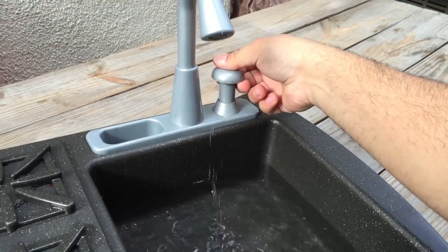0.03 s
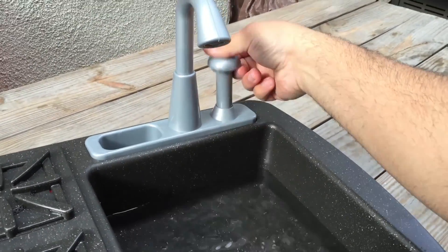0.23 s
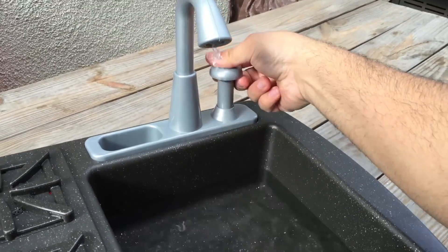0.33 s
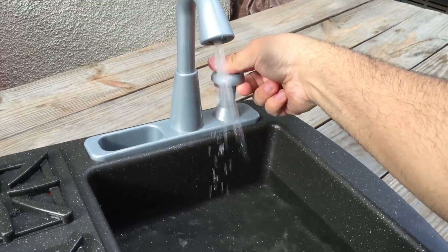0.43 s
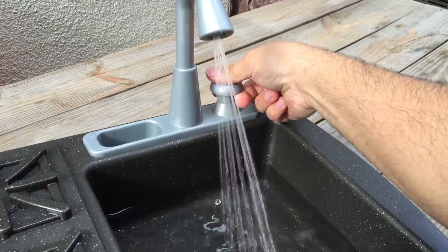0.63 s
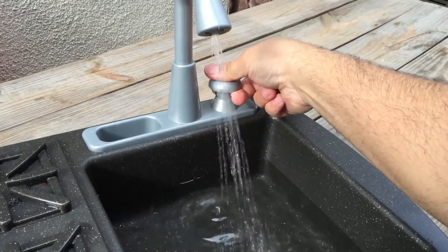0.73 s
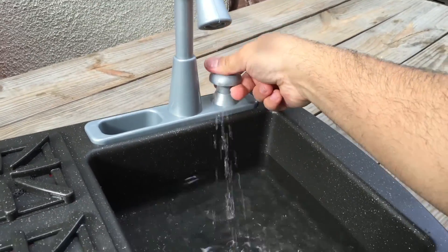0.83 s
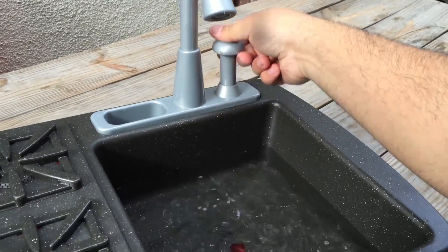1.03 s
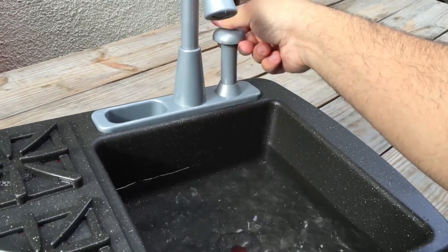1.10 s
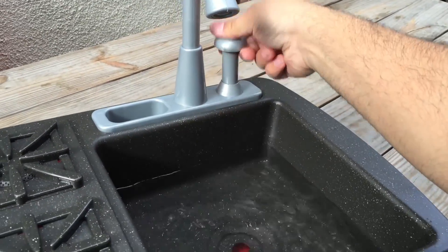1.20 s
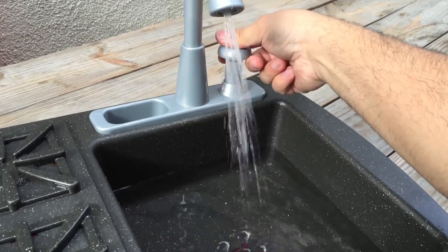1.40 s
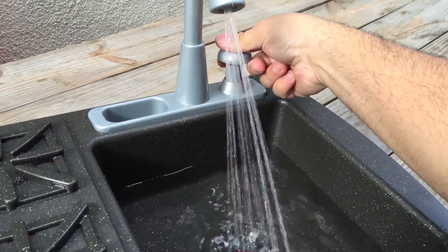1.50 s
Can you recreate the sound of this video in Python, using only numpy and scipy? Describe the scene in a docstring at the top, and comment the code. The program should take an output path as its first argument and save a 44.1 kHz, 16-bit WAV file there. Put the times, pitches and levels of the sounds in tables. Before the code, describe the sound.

Water sprays briefly from a toy faucet after its plastic plunger clacks, hissing and drumming in the basin. Drips settle, the pump knocks again and the nozzle sputters, close by over faint outdoor air and a low hum.

```python
"""A toy tap is pumped by hand over a plastic sink, outdoors beside a wall.
The plunger rubs in its barrel, knocking at the top of its travel and again as it is pressed.
The nozzle spits air, then sprays into the shallow water, drumming on the basin and leaving
bubbles and drips. A low hum and soft outdoor air lie behind."""
import sys
import numpy as np
from scipy import signal
from scipy.fft import rfft, irfft, next_fast_len
from scipy.io import wavfile
from scipy.ndimage import map_coordinates

SR = 44100
rng = np.random.default_rng(int(sys.argv[2]) if len(sys.argv) > 2 else 0)


def to_wav(s):
    """Save 16-bit WAV."""
    ch = np.atleast_2d(s).T  # columns
    pcm = np.round(np.clip(ch, -1, 1) * 32767)  # PCM
    wavfile.write(sys.argv[1], SR, pcm.astype(np.int16))


N = 68355

# Tone of drops hitting shallow water. Each row: frequency in Hz, level in dB.
SPLASH_TONE = [(300, -7.5), (850, -4.5), (1400, 0), (1750, -2), (2100, 8), (2450, -3), (3000, 1.5),
               (4200, -1.5), (6000, -16), (9000, -11.5), (16000, -18)]


def amp(db):
    """Decibels to gain."""
    return 10 ** (np.asarray(db) / 20)


def unit(x):
    """x scaled to rms 1."""
    return x / np.sqrt(np.mean(x ** 2) + 1e-20)


def since(start):
    """Seconds since start, zero before it."""
    return np.maximum(np.arange(N) / SR - start, 0)


def along(points, hz):
    """A curve through (Hz, value) points on a log frequency axis."""
    freqs, values = np.transpose(points)
    return np.interp(np.log(hz + 1), np.log(freqs + 1), values)


def level(points):
    """A gain envelope through (seconds, dB) points."""
    times, db = np.transpose(points)
    return amp(np.interp(since(0), times, db))


def filtered(x, response):
    """x through a filter given as a complex response of frequency."""
    size = 2 * next_fast_len(N)
    return irfft(rfft(x, size) * response(np.fft.rfftfreq(size, 1 / SR)), size)[..., :N]


def colour(x, tone):
    """x through a minimum-phase EQ of (Hz, dB) points, at rms 1."""
    size = 2 * next_fast_len(N)
    cepstrum = irfft(np.log(amp(along(tone, np.fft.rfftfreq(size, 1 / SR)))), size)
    cepstrum[1:size // 2] *= 2
    cepstrum[size // 2 + 1:] = 0
    return unit(irfft(rfft(x, size) * np.exp(rfft(cepstrum)), size)[:N])


def noise(tone):
    """Coloured noise at rms 1."""
    return colour(rng.standard_normal(N), tone)


def strike(start, rise, t60):
    """A hit's envelope: quick attack, then a fall of 60 dB in t60 seconds."""
    t = since(start)
    return -np.expm1(-t / rise) * amp(-60 * t / t60)


def ring(start, modes, rise):
    """Damped modes (Hz, dB, t60 in seconds) set off together."""
    t = since(start)
    return sum(amp(db) * strike(start, rise, t60) * np.sin(2 * np.pi * hz * t) for hz, db, t60 in modes)


def patter(tone, per_second, spread_db=4.5):
    """Tiny random blows of uneven size, coloured by tone, at rms 1."""
    blows = (rng.random(N) < per_second / SR) * rng.choice([-1, 1], N)
    sizes = amp(spread_db * np.clip(rng.standard_normal(N), -2, 2))
    return colour(blows * sizes, tone)


def plunger():
    """Each knock cracks, clicks the valve and rings the plastic; the plunger rubs as it slides."""
    # Plunger knocks. Each row: start in seconds, stem level in dB, stem ring centre in Hz,
    # levels of basin, thud, crack and valve click in dB, click pitch in Hz.
    knocks = [(0.0749, -31.5, 1380, -20, -37, -37.5, -35, 2760),
              (0.1816, -40, 1380, -31, -34.5, -35, -50, 6040),
              (0.2297, -16, 1510, -7.5, -44, -15.5, -26.5, 5980),
              (.353, -11.5, 1490, -13, -13.5, -21.5, -21, 5550),
              (0.3645, -22, 1690, -15, -24.5, -16.5, -14.5, 4300),
              (1.1368, -32, 1130, -27.5, -26, -31, -32, 4380),
              (1.1984, -22, 1460, -14.5, -29.5, -27.5, -29, 6030),
              (1.2998, -13.5, 1150, -15, -15, -22.5, -30, 5040),
              (1.3139, -27, 1830, -20.5, -27, -16.5, -19.5, 3660)]
    # Modes of the pump stem, the basin wall and the whole sink.
    # Each row: frequency in Hz, relative level in dB, t60 in seconds.
    stem_modes = [(1158, 1.5, 0.024), (1338, 10, 0.016), (1524, 8, 0.013), (1742, 1, .028),
                  (2040, -23, 0.02), (2790, 10, 0.021)]
    basin_modes = [(518, -15, 0.015), (590, 5, 0.014), (740, -5.5, 0.013), (878, -8.5, 0.028)]
    thud_modes = [(149, -24.5, 0.26), (216, -14, 0.066), (273, -3, 0.044), (342, -0.5, 0.049)]
    # Tones of the crack and the rub. Each row: frequency in Hz, level in dB.
    crack_tone = [(300, -11), (1500, 3), (2400, 0), (3200, -1), (4500, -8), (6400, -7), (7600, -20),
                  (8500, -16), (10000, -26.5), (11800, -17), (16000, -26)]
    rub_tone = [(100, -16), (220, 4), (550, -2), (780, 5), (1100, 3.5), (1700, -1.5), (2400, -19.5),
                (6000, -19), (16000, -41)]
    # Slides along the barrel. Each row: start and end in seconds, level in dB.
    slides = [(-.05, 0.435, -51), (1.105, 1.41, -49.5)]
    focus_db = 22  # loss one octave from the stem ring's centre
    bend_lag_s, bend_hz, slide_fade_s = 0.00482, 889, 0.014
    body, clicks = np.zeros(N), np.zeros(N)
    for start, stem_db, centre_hz, basin_db, thud_db, crack_db, valve_db, valve_hz in knocks:
        stem = [(hz, db - focus_db * np.log2(hz / centre_hz) ** 2, t60) for hz, db, t60 in stem_modes]
        body += amp(stem_db) * ring(start, stem, rise=0.00071)
        body += amp(basin_db) * ring(start, basin_modes, rise=0.0014)
        body += amp(thud_db) * ring(start, thud_modes, rise=0.0031)
        clicks += amp(crack_db) * strike(start, rise=0.00025, t60=0.02) * noise(crack_tone)
        clicks += amp(valve_db) * valve_tick(start, valve_hz, t60=0.013)
    # The low notes travel more slowly through the plastic and arrive last.
    body = filtered(body, lambda hz: np.exp(-2j * np.pi * bend_lag_s * bend_hz * np.arctan(hz / bend_hz)))
    stroke = sum(amp(db) * -np.expm1(-since(start) / slide_fade_s) * np.exp(-since(end) / slide_fade_s)
                 for start, end, db in slides)
    return body + clicks + stroke * patter(rub_tone, per_second=1100, spread_db=6.5)


def valve_tick(start, hz, t60):
    """A short wet click: a burst of noise in one broad resonance."""
    width_hz = 0.15 * hz
    band = filtered(rng.standard_normal(N), lambda f: 1 / (1 + (2 * (f - hz) / width_hz) ** 2))
    return strike(start, rise=0.00027, t60=t60) * unit(band)


def nozzle():
    """Trapped air leaks and spits out in whistling puffs, the jet crackles and the valve ticks."""
    # Spits of air and water. Each row: peak time in seconds, hiss level in dB,
    # half length in seconds, whistle level in dB.
    spits = [(.535, -36, 0.0017, -47), (0.5432, -27.5, 0.0013, -24.5), (0.55, -38, 0.0018, -62),
             (0.568, -40, 0.0007, -53), (0.601, -28, 0.002, -36), (.727, -21.5, 0.0014, -55),
             (0.884, -39.5, 0.0017, -50), (1.483, -33.5, 0.0017, -32), (1.488, -37, 0.0018, -37.5),
             (1.495, -32.5, 0.001, -31), (1.501, -46, 0.0032, -44), (1.513, -32.5, 0.0015, -40),
             (1.5345, -31, 0.00076, -55), (1.5401, -37.5, 0.00076, -35.5), (1.5442, -34, 0.00067, -42),
             (1.5495, -30.5, 0.00099, -33)]
    # Tones of the spit, the whistle and the jet. Each row: frequency in Hz, level in dB.
    spit_tone = [(500, -8.5), (2000, -14), (3000, -16), (5300, -12), (6650, -14), (7400, -14.5),
                 (10000, -9.5), (12000, -2), (13500, -5), (14800, 4), (16000, -9)]
    whistle_tone = [(2000, -42), (4500, -19), (5600, -22), (6200, -6.5), (6650, 6), (7200, -18.5),
                    (9000, -13), (16000, -48)]
    jet_tone = [(1500, -28), (4000, -10.5), (6300, 0.5), (8000, -11.5), (10500, -6.5), (12000, 0.5),
                (13500, -7), (15000, 2), (16000, -9)]
    # Air leaking ahead of the water. Each row: start and end in seconds, level in dB.
    leaks = [(0.56, .594, -57), (1.472, 1.56, -48.5)]
    # Envelopes of the opening dribble and the full jet. Each row: time in seconds, level in dB.
    dribble_levels = [(0, -42.5), (.05, -68), (.15, -79), (.25, -60), (.33, -73)]
    jet_levels = [(.588, -71), (.598, -34), (.64, -35.5), (.70, -36), (.755, -29), (.80, -36), (.835, -42),
                  (.88, -56), (.96, -71), (1.05, -91)]
    # Thin ticks of the wet valve. Each row: start in seconds, pitch in Hz, level in dB.
    valve_ticks = [(0.247, 6300, -35), (0.2951, 6400, -32), (0.4847, 4880, -34), (1.0662, 10000, -34.5),
                   (1.167, 8100, -46), (1.262, 5300, -40), (1.2605, 9260, -38.5), (1.4735, 5400, -25.5)]
    t = since(0)
    hiss, whistle = noise(spit_tone), noise(whistle_tone)
    puffs = sum(np.exp(-((t - peak) / half) ** 2 / 2) * (amp(hiss_db) * hiss + amp(whistle_db) * whistle)
                for peak, hiss_db, half, whistle_db in spits)
    leak = sum(amp(db) * (t > start) * (t < end) for start, end, db in leaks) * noise(spit_tone)
    jet_start = jet_levels[0][0]
    flow = level(jet_levels) * (t > jet_start) + level(dribble_levels)
    jet = flow * patter(jet_tone, per_second=3700, spread_db=5)
    ticks = sum(amp(db) * valve_tick(start, hz, t60=0.0076) for start, hz, db in valve_ticks)
    return puffs + (leak + jet) * flutter(depth_db=2.4) + ticks


def flutter(depth_db, rate_hz=420):
    """A fast random gain: the jet breaks up into clumps of drops."""
    position = np.arange(N) * rate_hz / SR
    wobble = map_coordinates(rng.standard_normal(int(position[-1]) + 4), [position])
    return unit(amp(depth_db * wobble))


def bubbles(centre_hz, spread_octaves, count):
    """Small bubbles ping at random times, each rising in pitch as it dies; rms 1."""
    life_cycles, size_range_db = 28, 18
    when, size, *dice = rng.random((count, 5)).T[:, :, None]
    hz = centre_hz * 2 ** (spread_octaves * 2 * (sum(dice) - len(dice) / 2))
    t = np.arange(SR // 50) / SR
    age = t * hz / life_cycles
    envelope = amp(size_range_db * size ** 2 - 60 * age) * -np.expm1(-t * hz)
    pings = envelope * np.sin(2 * np.pi * hz * t * (1 + 0.12 * np.minimum(age, 1)))
    samples = (when * N).astype(int) + np.arange(len(t))
    return unit(np.bincount(samples.ravel(), pings.ravel(), N)[:N])


def settling_water():
    """The water in the sink fizzes, larger drops fall into it and the intake glugs softly."""
    # Envelope of the settling water. Each row: time in seconds, level in dB.
    trickle_levels = [(0, -43), (.1, -49.5), (.2, -50), (.32, -61), (.45, -52.5), (.55, -54.5), (.9, -49.5),
                      (1.0, -54), (1.05, -62), (1.11, -62.5), (1.17, -52), (1.27, -80), (1.37, -46),
                      (1.44, -80), (1.55, -66.5)]
    # Tone of the fizz. Each row: frequency in Hz, level in dB.
    fizz_tone = [(500, -26), (1300, 5.5), (2000, -3.5), (2900, 2), (4500, -9), (7000, -19), (12000, -19.5),
                 (16000, -15)]
    # Single drops. Each row: start in seconds, bubble pitch in Hz, bubble and splat levels in dB.
    drips = [(0.034, 2910, -39, -48), (0.053, 1455, -36, -39), (0.138, 1380, -39, -58),
             (.224, 1460, -35, -44), (0.486, 2700, -36.5, -40), (0.524, 2670, -37, -38),
             (0.534, 2800, -33, -39), (.624, 2690, -18.5, -46), (.726, 603, -18, -30),
             (.779, 2080, -16.5, -34), (.797, 1510, -19.5, -21), (.861, 1560, -29, -48),
             (0.917, 2875, -28, -33.5), (0.938, 4150, -44, -55), (0.969, 2750, -32, -37),
             (1.024, 2530, -33.5, -53), (1.388, 2820, -29, -32.5), (1.4727, 2670, -37.5, -33.5)]
    # Water drawn back into the pump. Each row: start in seconds, pitch in Hz, level in dB.
    glugs = [(.994, 350, -37.5), (1.0, 574, -42), (1.073, 264, -33.5), (1.077, 1063, -41.5)]
    fizz = amp(-4.5) * patter(fizz_tone, per_second=1600)
    froth = amp(-6) * bubbles(centre_hz=2810, spread_octaves=0.454, count=300)
    water = level(trickle_levels) * (fizz + froth)
    for start, hz, bubble_db, splat_db in drips:
        water += amp(splat_db) * strike(start, rise=0.001, t60=0.022) * noise(SPLASH_TONE)
        water += ring(start, [(hz, bubble_db, 0.024)], rise=0.001)
    return water + sum(ring(start, [(hz, db, 0.034)], rise=0.00087) for start, hz, db in glugs)


def air_and_hum():
    """Steady outdoor air and a low hum that swells and fades."""
    # Tone of the air. Each row: frequency in Hz, level in dB.
    air_tone = [(20, -48), (55, 4.5), (130, 1.5), (200, 2.5), (300, -2.5), (700, -9.5), (1500, -15),
                (4000, -38), (8000, -49), (16000, -53)]
    # Envelope of the hum. Each row: time in seconds, rms level in dB.
    hum_levels = [(0, -51), (.106, -62), (.188, -44), (.296, -57), (.41, -50), (.46, -58), (.548, -46),
                  (.76, -48.5), (.85, -58), (.94, -50.5), (1.0, -82), (1.1, -65), (1.2, -46.5), (1.41, -50),
                  (1.55, -68)]
    hum_hz = 79.2
    hum = level(hum_levels) * np.sqrt(2) * np.sin(2 * np.pi * hum_hz * since(0))
    return amp(-54) * noise(air_tone) + hum


def spray():
    """Droplets splash, trap bubbles and, as the jet gathers force, drum on the basin."""
    # Envelopes of the spray landing and the basin drumming. Each row: time in seconds, level in dB.
    landing_levels = [(.59, -86), (.603, -40.5), (.624, -29.5), (.66, -31), (.72, -33), (.80, -31),
                      (.83, -37.5), (.88, -52.5), (.96, -61), (1.1, -62.5)]
    drum_levels = [(.6, -56), (.655, -35.5), (.73, -34.5), (.80, -33), (.86, -48.5), (.92, -65.5),
                   (1.0, -60)]
    # Tone of the basin under the jet. Each row: frequency in Hz, level in dB.
    drum_tone = [(100, -21.5), (200, -16), (350, -13), (470, -10), (535, -0.5), (605, -1.5), (690, -11),
                 (800, -15.5), (1400, -13.5), (2500, -41)]
    splash = flutter(depth_db=1.6) * patter(SPLASH_TONE, per_second=5000)
    froth = amp(-5) * bubbles(centre_hz=2990, spread_octaves=0.5, count=1100)
    drum = level(drum_levels) * patter(drum_tone, per_second=1300)
    return level(landing_levels) * (splash + froth) + drum


def yard_reflections(sound):
    """Quick reflections inside the sink and a faint tail from deck and wall."""
    # Tone of the tail. Each row: frequency in Hz, level in dB.
    tail_tone = [(100, 3), (190, 8), (330, 5.5), (580, -2.5), (850, 9), (1400, -2), (4000, 1), (8000, -4.5),
                 (16000, -9)]
    # Decay of the tail. Each row: frequency in Hz, t60 in seconds.
    tail_t60 = [(150, 0.31), (1000, 0.23), (4000, 0.24), (6500, 0.23), (8000, 0.17), (16000, .08)]
    tail_db, near_db, near_t60_s = -17.5, -11, 0.024
    hz, frame_s, spectra = signal.stft(rng.standard_normal(SR // 2), SR, nperseg=256)
    decay = amp(along(tail_tone, hz)[:, None] - 60 * frame_s / along(tail_t60, hz)[:, None])
    tail = signal.istft(spectra * decay, SR, nperseg=256)[1]
    t = np.arange(len(tail)) / SR
    tail *= t > 0.006  # silent until the first reflection returns
    near = rng.standard_normal(len(t)) * amp(-60 * t / near_t60_s) * (t > 0.002)
    response = amp(tail_db) * tail / np.linalg.norm(tail) + amp(near_db) * near / np.linalg.norm(near)
    return signal.fftconvolve(sound, response)[:N]


def scene():
    """Pump and water, close by in the yard, in mono."""
    toy = plunger() + nozzle() + spray() + settling_water()
    return (toy + yard_reflections(toy) + air_and_hum())[None]


def record(dry):
    """A brick-wall low-pass trims the very top of the treble."""
    return filtered(dry, lambda hz: hz < 15800)


dry = scene()
out = record(dry)
to_wav(out)
```